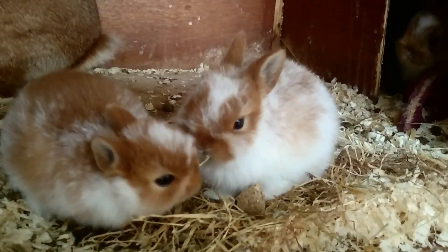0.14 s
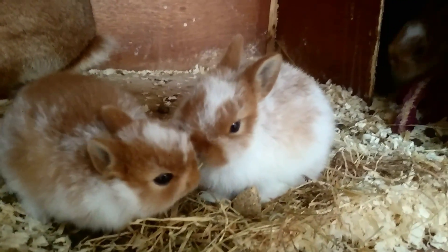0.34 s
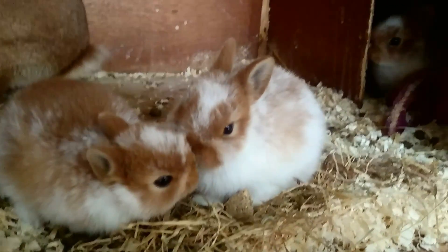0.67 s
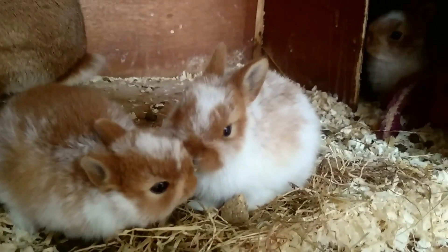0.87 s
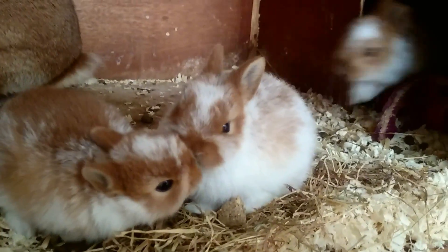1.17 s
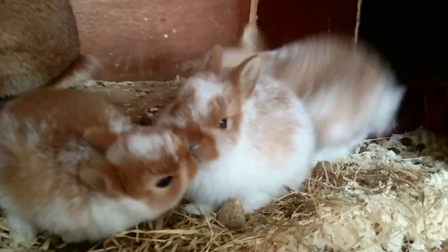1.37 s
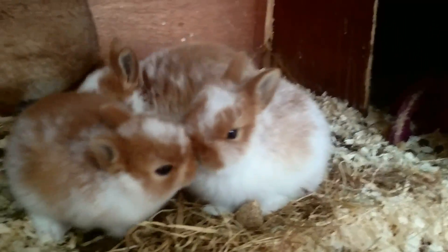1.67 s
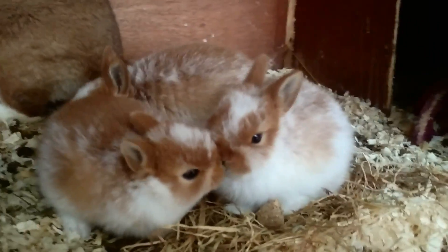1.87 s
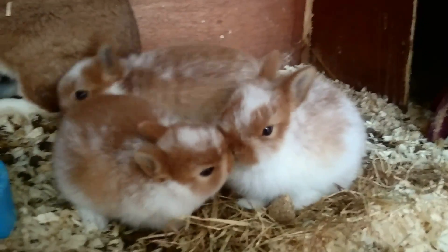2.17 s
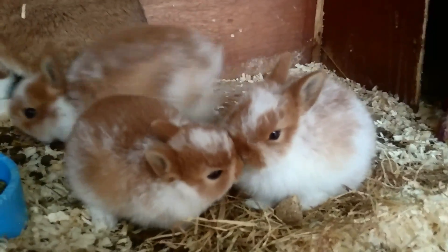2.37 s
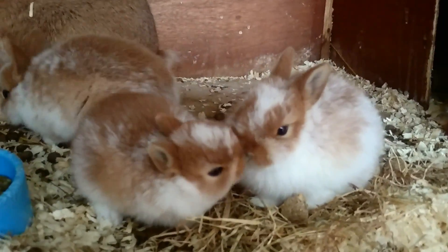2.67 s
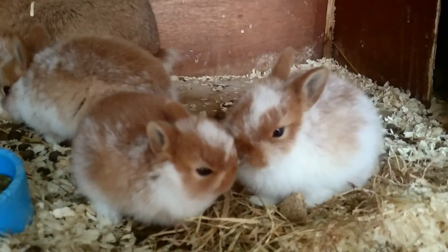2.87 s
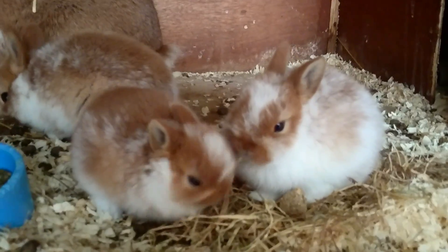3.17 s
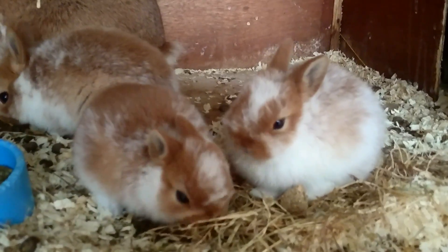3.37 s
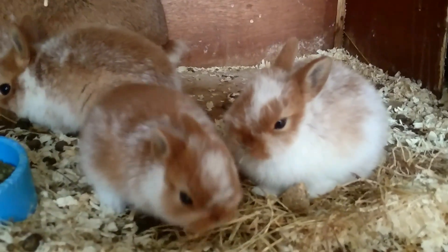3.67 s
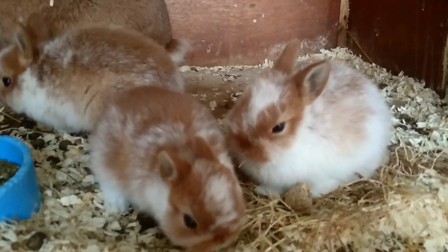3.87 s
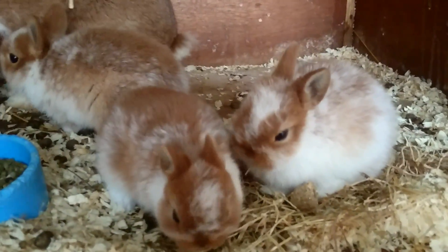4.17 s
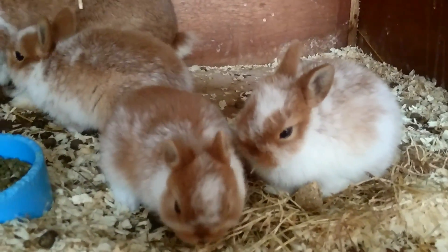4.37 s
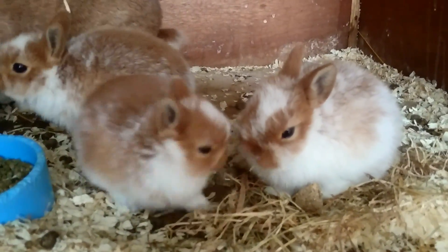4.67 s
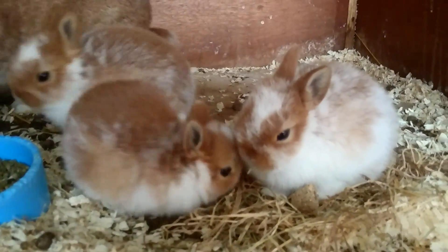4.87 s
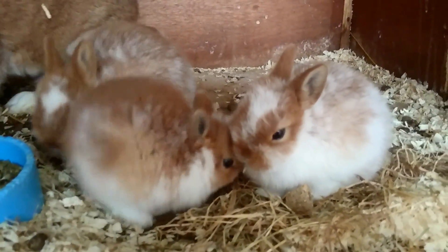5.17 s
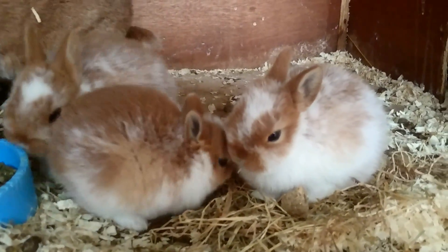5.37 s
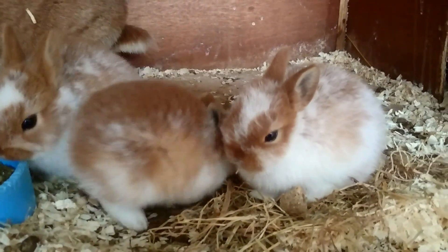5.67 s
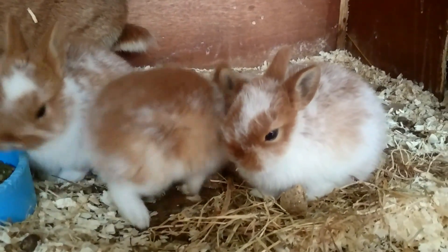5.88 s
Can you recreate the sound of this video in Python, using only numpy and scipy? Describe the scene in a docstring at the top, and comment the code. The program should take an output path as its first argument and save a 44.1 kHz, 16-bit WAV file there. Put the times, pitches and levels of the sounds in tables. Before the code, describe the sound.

A close, dry stereo sound inside a small wooden hutch, over soft steady hiss and a very faint low hum. From 0 s, rabbits shuffle in shavings and hay: fine, mid-high crackling in short uneven bursts, with grainier crunch and airy hay rustle. Crisp snaps cluster at 0.9-1.5 s, the brightest near 1.2 s, while soft paw thumps fall mostly between 0.05 and 1.6 s and fur brushes faintly on wood. Lighter rustling continues through 2-3.8 s, with a slight lull near 2.5 s, a crumbling crunch at 3.2 s and thin stalk squeaks around 3.6 s. At 3.95 s a paw thuds and a hard bit clacks in quick contacts. Then it is sparse: a small squeak at 4.6 s, four short low thrums with faint rising buzz from 5.0 to 5.3 s, quiet rubbing, and small snaps at 5.6-5.8 s, leaning right, before a last light rustle.

```python
"""Young rabbits shuffle and hop on dry wood shavings and hay: random clicks, coloured as flake, litter and hay.
Flakes crack, stalks scrape or squeak, a hard piece clacks and fur rubs the wood, from noise and damped rings.
The place is a small wooden hutch with short echoes; paws land on its floor board.
Behind are a soft hiss, a wavering low hum and a thrum that swells briefly four times with a rising buzz.
A two-port microphone hears it, with a different colour on each side and the extreme top cut."""
import sys
import numpy as np
from scipy import signal
from scipy.fft import rfft, irfft, next_fast_len
from scipy.io import wavfile
from scipy.ndimage import uniform_filter1d

SR = 44100
rng = np.random.default_rng(int(sys.argv[2]) if len(sys.argv) > 2 else 0)


def wav_out(sig):
    """Save sig, one row per channel (or a flat mono array), as 16-bit PCM at SR to the path in sys.argv[1]."""
    wavfile.write(sys.argv[1], SR, np.round(np.clip(np.atleast_2d(sig).T, -1, 1) * 32767).astype(np.int16))


N = 266364
TIME = np.arange(N) / SR

# Levels are settings ahead of each source's own trims, the panning and the microphone.
# rabbits shifting their feet or pushing through the litter:
# start_s, length_s, crackle_db, crunch_db (re crackle), hay_db (re crackle)
SHUFFLES = [(0, .11, -53, -9.5, -9.5), (0.213, 0.047, -46, -7.5, -11.5), (0.3, 0.015, -36.5, -16, -14),
            (0.334, 0.075, -42, -10, -13), (0.431, 0.2077, -51.5, -12, -10), (0.629, 0.06, -44, -13, -12),
            (0.729, .11, -46.5, -12, -12.5), (0.86, 0.0482, -43.5, -15.5, -10.5),
            (1, 0.03043, -40, -14.5, -14.5), (1.11, 0.075, -42, -18, -10),
            (1.235, 0.056, -45.5, -19.5, -15.5), (1.34, 0.022, -40, -17, -12.5),
            (1.405, 0.086, -41.5, -9.5, -10), (1.519, 0.074, -52, -10, -6), (1.694, 0.096, -47.5, -15, -14),
            (1.836, 0.0566, -47.5, -19, -14.5), (1.923, 0.094, -45.5, -19.5, -15.5),
            (2.15, 0.085, -40.5, -19.5, -13), (2.261, 0.089, -41, -15.5, -10.5),
            (2.574, 0.0132, -50, -12.5, -12), (2.678, 0.016, -54, -9, -16.5),
            (2.769, 0.049, -42.5, -13.5, -16), (2.831, 0.082, -45.5, -13, -10.5),
            (2.932, 0.077, -51, -6, -7.5), (3.053, 0.025, -46, -9.5, -5), (3.114, 0.058, -51, -8.5, -8),
            (3.195, 0.096, -45.5, -12, -7.5), (3.311, 0.081, -56, -10.5, -7.5), (3.463, .03, -47, -5.5, -9),
            (3.498, 0.02546, -37.5, -19.5, -11.5), (3.57, 0.07, -48, -12, -16),
            (3.669, 0.034, -42.5, -18, -16), (3.725, 0.047, -40.5, -17, -15),
            (3.799, 0.017, -41, -22, -13.5), (3.85, 0.14, -47, -12, -11), (4.017, 0.0384, -60, -7, -4),
            (4.147, 0.12, -58.5, -17.5, -9.5), (4.37, 0.037, -52.5, -8, -12.5),
            (4.453, 0.033, -57.5, -9, -26), (4.554, .025, -51.5, -15, -26), (4.656, 0.085, -55, -19, -35.5),
            (5.257, 0.13, -56.5, -7, -12.5), (5.413, 0.055, -52, -6, -10.5), (5.589, 0.1, -55.5, -7, -17),
            (5.772, 0.18, -55, -10.5, -11), (5.96, 0.048, -46, -9.5, -12.5)]
# pitch of the flakes underfoot, higher where they are smaller: time_s, pitch_hz
FLAKE_PITCH = [(0, 5430), (0.9, 4150), (1.16, 5403), (2.2, 4170), (3.05, 4462), (3.25, 5404), (4.1, 5085),
               (4.6, 4286)]
# flakes and stalks that give way:
# start_s, level_db (over 10 ms), crunch_db (re crackle), hay_db (re crackle), crumble_s, pitch_hz
SNAPS = [(0.221, -43.5, -10.5, -10, 0.0022, 4570), (0.4356, -38, -13.5, -12.5, 0.002, 5200),
         (0.552, -41.5, -18.5, -31, 0.0021, 4906), (0.9115, -40, -19, -27, 0.0012, 4178),
         (0.9324, -34.5, -12.5, -22.5, .0022, 4190), (0.9457, -40.5, -12, -18, 0.002, 4180),
         (0.9808, -47, -16.5, -22, 0.00045, 3970), (1.003, -33.5, -16, -24.5, 0.0021, 4260),
         (1.014, -31.5, -19.5, -34, 0.00086, 4500), (1.092, -43.5, -21, -18, 0.004, 4380),
         (1.1223, -39, -13.5, -27, 0.0031, 4500), (1.2155, -30.3, -23.5, -20, 0.0011, 5170),
         (1.2905, -47, -19, -23, 0.00028, 4234), (1.445, -34, -7.5, -16.5, .009, 5490),
         (1.467, -42.5, -9, -15, .0035, 4460), (1.494, -43.5, -28, -25, 0.0006, 4750),
         (1.587, -51, -25, -15, 0.0036, 4494), (1.6394, -50, -17.5, -15, 0.0029, 4947),
         (1.9025, -40, -23, -24, 0.00079, 4590), (2.115, -47, -17, -27.5, 0.0155, 4442),
         (2.176, -42.5, -23, -21, 0.00205, 4971), (2.2852, -36.5, -15, -18, 0.001106, 4049),
         (2.3238, -39.5, -12, -22, 0.0029, 4355), (2.7274, -48.5, -21, -21, 0.0046, 4910),
         (3.072, -46, -11, -12.5, 0.00058, 4649), (3.084, -49.5, -22, -24, 0.00178, 4510),
         (3.183, -36.5, -25, -14.5, 0.012, 4874), (3.211, -39, -29, -17, 0.00071, 4950),
         (3.245, -44.5, -2.5, -15, 0.025, 4510), (4.558, -50, -17.5, -18.5, 0.0056, 4620),
         (4.912, -49, -16.5, -43, 0.00259, 3997), (5.565, -47, -1, -28.5, 0.012, 4090),
         (5.7631, -44, -6.5, -17, 0.00626, 5080), (5.7699, -39.5, -17, -20.5, 0.001006, 4320)]
# colours of flakes, deep litter and hay: frequency_hz, density_db (relative, per Hz)
CRACKLE_COLOUR = [(1800, -64), (2900, -13), (3900, -4.5), (4400, 0.5), (4850, 1), (5350, -2.5), (5900, -2),
                  (6500, -10.5), (7400, -23), (10000, -63)]
CRUNCH_COLOUR = [(120, -51), (350, -10.5), (800, -16), (1700, -6.5), (2200, 0), (2650, 0.5), (3200, -8),
                 (4200, -21.5)]
HAY_COLOUR = [(4500, -24), (7000, 5), (9500, 1), (11200, 2.5), (13300, -6), (15300, -3.5), (17000, 1)]
# single stalks dragged over the wood:
# start_s, length_s, level_db (rms at mid-scrape), pitch_hz (at start), glide_octaves, width_hz
SCRAPES = [(1.148, 0.073, -57, 2367, -0.035, 128), (2.86, 0.09, -61, 14190, 0, 3002),
           (3.015, 0.2, -59, 14800, 0, 3396), (3.578, 0.033, -46, 4530, -0.043, 50),
           (3.76, 0.19, -55.5, 2650, -0.3, 380.1), (4.621, 0.054, -50.5, 4525, -0.05, 200),
           (4.639, 0.01373, -47, 4427, -0.0097, 59.86), (5.76, 0.011, -50, 14300, 0.064, 2995)]
# contacts of one hard piece of litter, nudged as a paw lands: start_s, level_db
CLACKS = [(3.9398, -41), (3.9547, -30), (3.9558, -39.5), (3.9592, -40.5)]
# ringing modes of that hard piece: pitch_hz, level_db, t60_s
CHIP_MODES = [(1346, -14.5, 0.024), (2030, 3, 0.013), (2257, 3.5, 0.0233), (2555, -7, 0.026),
              (3934, 4, 0.0053)]
# fur rubbing along the wood: start_s, length_s, level_db
RUBS = [(0, 1.48, -72.5), (2.71, 0.43, -74), (3.273, 0.198, -63.5), (5.245, 0.34, -68.5)]
# resonances of the rubbed wall: pitch_hz, width_hz, level_db
WALL_RESONANCES = [(556, 310, 1), (838, 110, 2.5)]
# where the moving rabbit is: time_s, left_right_db
PLACE = [(4.7, 0), (5.75, -4.5), (6.04, 0)]
# paws landing on the floor board: start_s, level_db, knock_db (added to the upper modes)
PAWS = [(0.055, -54, -4), (0.216, -60, 8.5), (0.321, -51.5, -4), (0.389, -66, 25), (0.576, -49.5, -10.5),
        (1.086, -61, 0), (1.173, -50.5, -15), (1.373, -55.5, -7), (1.47, -47.5, 1), (1.522, -50.5, -19),
        (1.575, -52, -21), (3.252, -57.5, 9), (3.935, -48.5, -4.5), (5.565, -64, 8), (5.762, -61.5, 9)]
# modes of the floor board: pitch_hz, level_db, t60_s
BOARD_MODES = [(76, -7.5, 0.205), (128, -1, 0.064), (161, -5, 0.03), (418, -5.5, 0.092), (570, 2, 0.018),
               (877, -2, 0.029)]
# swells of the low thrum: start_s, length_s, level_db, buzz_db (re thrum), buzz_hz (at start)
THRUMS = [(4.974, 0.068, -48, -14, 222), (5.077, 0.05, -57.5, -18, 220), (5.183, 0.035, -60, -14.5, 250),
          (5.306, 0.024, -52.5, -9.5, 252)]
# colour of the background hiss: frequency_hz, density_db (relative, per Hz)
HISS_COLOUR = [(26, -25), (43, 21.5), (62, 12), (130, 5.5), (300, 2), (550, -2.5), (1000, 0.5), (3200, 2),
               (4700, 7), (7500, -7), (13500, -9), (15400, -6)]
# difference between the two microphone ports: frequency_hz, left_right_db
PORTS = [(60, -7.5), (300, -4), (700, -2.5), (1500, -5.5), (2250, -9.5), (3300, -3.5), (4500, -4),
         (5900, -7.5), (7200, 0.5), (9000, -1.5), (10800, 4), (13500, -5), (15500, 2)]

SHUFFLE_ATTACK_S, SHUFFLE_RELEASE_S = 0.035, 0.022
ATTACK_SHARE = 0.22  # a longer push builds longer: extra attack as a share of its length
# the litter never quite rests under the sitting rabbits
IDLE_CRACKLE_DB, IDLE_CRUNCH_DB, IDLE_HAY_DB = -68, -72.5, -98
CRACK_SWELL_S = 0.00034  # a crack's rise time
CLEAN_BREAK_S = 0.00196  # crumbling time at which the crack's energy share is one half
RUB_ATTACK_S, RUB_RELEASE_S = 0.0254, 0.24
THRUM_HZ, BUZZ_RISE_HZ_PER_S = 67, 748
THRUM_ATTACK_S, THRUM_RELEASE_S = 0.034, 0.0237
HISS_DB, HUM_DB = -59.5, -72.5
RIGHT_LAG_S = 0.00031  # the direct sound reaches the right side later
CUTOFF_HZ = 15850


def litter(wander_hz=350, slips_per_s=2100, rate_rise=0.4, clump_db=1.11):
    """Flakes slip in clumps, more often when stirred harder; each slip sounds in flake, deep litter and hay."""
    _, _, _, crunch_db, hay_db = np.transpose(SHUFFLES)
    _, _, snap_crunch_db, snap_hay_db, _, _ = np.transpose(SNAPS)
    stir = stirring(0, IDLE_CRACKLE_DB)
    # slips_per_s holds where the stir is -45 dB
    born = rng.random(N) < slips_per_s * (stir / from_db(-45)) ** rate_rise / SR
    clumps = from_db(clump_db * drift(54))

    crackle = clumps * stir * slips(born, spread_db=4.0)
    crunch = from_db(5.0) * clumps * stirring(crunch_db, IDLE_CRUNCH_DB) * slips(born, spread_db=3.0)
    hay = clumps * stirring(hay_db, IDLE_HAY_DB) * slips(born, spread_db=3.5)

    # the crackle of a snap gets the energy that its first crack leaves over
    crumbling_db = 10 * np.log10(1 - crack_share())
    crackle += from_db(2.5) * snaps(crumbling_db, crumbs_per_s=2700, crumb_db=-7.5)
    crunch += from_db(9.5) * snaps(snap_crunch_db, crumbs_per_s=2000, crumb_db=4.5)
    hay += from_db(5.0) * snaps(snap_hay_db, crumbs_per_s=2500, crumb_db=-4)

    flake_hz = in_time(FLAKE_PITCH)[0] + wander_hz * drift(8.1)
    crackle = flakes(crackle, flake_hz, 2490, 8270, reach_hz=1038, cycles=22,
                     ring_db=-1.0, patchy_db=6.5, count=19)
    crunch = flakes(crunch, np.full(N, 2200), 836, 2990, reach_hz=1810, cycles=7.5,
                    ring_db=5.5, patchy_db=5.0, count=10)
    return scatter(crackle, CRACKLE_COLOUR) + scatter(crunch, CRUNCH_COLOUR) + scatter(hay, HAY_COLOUR)


def stirring(material_db, idle_db):
    """How strongly the shuffles stir one material of the litter, as a gain."""
    s, length_s, db, _, _ = np.transpose(SHUFFLES)
    attack_s = SHUFFLE_ATTACK_S + ATTACK_SHARE * length_s
    moving = swells(s, length_s, db + material_db, attack_s, SHUFFLE_RELEASE_S)
    return np.hypot(moving, from_db(idle_db))


def slips(born, spread_db):
    """Clicks of uneven size and random sign at the given instants, evened to a slow rms near 1."""
    unevenness = np.minimum(rng.exponential(1, N), 4.5)
    sizes = born * from_db(spread_db * unevenness) * rng.choice([-1, 1], N)
    slow_power = np.maximum(uniform_filter1d(sizes ** 2, size=1400), 0)
    return sizes / np.sqrt(slow_power + 0.0005)


def snaps(extra_db, crumbs_per_s, crumb_db, build_share=0.26):
    """Each snap is one fracture and a dying run of smaller ones; a long crumbling takes a moment to build."""
    out, t = np.zeros(N), TIME[:SR // 15]
    for (s, db, _, _, crumble_s, _), more_db in zip(SNAPS, extra_db):
        age = t / max(crumble_s, 1e-4)
        crumbs = (rng.random(len(t)) < crumbs_per_s / SR) * rng.standard_normal(len(t))
        burst = from_db(crumb_db) * crumbs * np.exp(-age) * np.minimum(age / build_share, 1)
        burst[0] = np.exp(-crumble_s / (2 * CLEAN_BREAK_S))
        # level as an rms over 10 ms
        burst *= from_db(db + more_db) * np.sqrt(SR / 100) / np.linalg.norm(burst)
        at = int(s * SR)
        out[at:at + len(t)] += burst[:N - at]
    return out


def flakes(clicks, centre_hz, low_hz, high_hz, reach_hz, cycles, ring_db, patchy_db, count):
    """Each click also rings a few flakes near a centre pitch; which ones speak most keeps changing."""
    at, rings = np.flatnonzero(clicks), 0
    pitches = np.linspace(low_hz, high_hz, count)
    favour = []
    for hz in pitches:
        nearness = 1 / (1 + ((hz - centre_hz[at]) / reach_hz) ** 2)
        favour.append(from_db(patchy_db * drift(25)[at]) * nearness)
    favour = np.array(favour)
    favour /= np.linalg.norm(favour, axis=0)
    for hz, share in zip(pitches, favour):
        t60 = cycles / hz
        struck = np.zeros(N)
        struck[at] = clicks[at] * share * rng.choice([-1, 1], len(at))
        # scaled so that the rings are as strong per Hz as the bare click
        even = np.sqrt(8 * np.log(1000) * (high_hz - low_hz) / t60) / SR
        rings = rings + even * ring(struck, hz, t60)
    return (clicks + from_db(ring_db) * rings) / np.sqrt(1 + from_db(2 * ring_db))


def scatter(clicks, spectrum, moves_per_s=60, count=8):
    """Clicks take their material's colour; each short run of them comes from one spot with its own echoes."""
    spot = np.cumsum(rng.random(N) < moves_per_s / SR) % count
    tone = colour(spectrum, size=1024)
    out = 0
    for k in range(count):
        echoes = hutch(scatter_db=4.5, scatter_t60=0.047, tail_db=-1.0, tail_t60=0.13, size=6000)
        out = out + through(clicks * (spot == k), through(tone, echoes))
    return out


def crack_share():
    """The share of each snap's energy that goes into its first crack; the rest crumbles."""
    crumble_s = np.maximum(np.array(SNAPS)[:, 4], 1e-4)
    return 1 / (1 + (crumble_s / CLEAN_BREAK_S) ** 2)


def cracks(level_db=1.5):
    """Each breaking flake rings for a few cycles at its own pitch, on top of the litter and so nearly dry."""
    out, t = np.zeros(N), TIME[:SR // 100]
    for (s, db, _, _, _, hz), share in zip(SNAPS, crack_share()):
        tone = t * np.exp(-t / CRACK_SWELL_S) * np.sin(2 * np.pi * hz * t)
        at = int(s * SR)
        out[at:at + len(t)] += from_db(db + level_db) * np.sqrt(share) * rms_one(tone)
    return through(out, near_walls())


def scrapes(own_share=0.47):
    """Stick and slip keeps a narrow resonance of the stalk going; its pitch glides a little."""
    out = np.zeros((2, N))
    for s, length, db, hz, glide, width in SCRAPES:
        u = np.linspace(0, 1, int(length * SR))
        noise = rng.standard_normal((3, SR)) + 1j * rng.standard_normal((3, SR))
        both_sides = noise[0] + own_share * noise[1:]
        lowpass = signal.butter(2, width / 2, fs=SR, output="sos")
        grip = signal.sosfilt(lowpass, both_sides)[:, -len(u):]  # the settled end
        phase = 2 * np.pi * np.cumsum(hz * 2 ** (glide * u)) / SR
        tone = np.real(grip * np.exp(1j * phase))
        at = int(s * SR)
        out[:, at:at + len(u)] += (from_db(db) * np.sin(np.pi * u) * rms_one(tone))[:, :N - at]
    return out


def clack(echo_db=-9):
    """A few quick contacts ring the hard piece, each mode with a strength of its own."""
    s, contact_db = np.transpose(CLACKS)
    out = np.zeros(N)
    for k, (hz, db, t60) in enumerate(CHIP_MODES):
        hits = np.zeros(N)
        hits[(s * SR).astype(int)] = from_db(contact_db + db + rng.normal(0, 1, len(s)))
        out += (-1) ** k * ring(hits, hz, t60)
    return out + from_db(echo_db) * through(out, near_walls())


def fur(uneven_db=2.0):
    """Friction noise of uneven pressure sounds in the resonances of the wall."""
    pressure = swells(*np.transpose(RUBS), RUB_ATTACK_S, RUB_RELEASE_S) * from_db(uneven_db * drift(7.8))
    friction = rng.standard_normal(N) + 0.66 * rng.standard_normal((2, N))
    wall = 0
    for hz, width, db in WALL_RESONANCES:
        t60 = np.log(1000) / (np.pi * width)
        wall = wall + from_db(db) * rms_one(ring(friction, hz, t60))
    highpass = signal.butter(4, 470, "high", fs=SR, output="sos")
    return pressure * rms_one(signal.sosfilt(highpass, wall))


def paws(knock_above_hz=200, settle_s=0.054, settle_db=-5):
    """A padded foot thumps on the board and settles; a firm one also wakes the upper modes."""
    out, t = np.zeros(N), TIME[:SR // 10]
    s, db, knock_db = np.transpose(PAWS)
    for k, (hz, mode_db, t60) in enumerate(BOARD_MODES):
        upper = hz > knock_above_hz
        pushes = np.zeros(N)
        for at, gain in zip((s * SR).astype(int), from_db(db + mode_db + knock_db * upper)):
            settling = rng.standard_normal(len(t)) * np.exp(-t / settle_s)
            pushes[at:at + len(t)] += gain * from_db(settle_db) * settling / np.linalg.norm(settling)
            pushes[at] += gain
        out += (-1) ** (k * upper) * ring(pushes, hz, t60)
    return signal.sosfilt(signal.butter(2, 55, "high", fs=SR, output="sos"), out)


def thrum(waver=0.033, second_db=-19):
    """A wavering low tone swells; each swell wakes a buzz that bends upward and throbs with the tone."""
    phase = 2 * np.pi * np.cumsum(THRUM_HZ * (1 + waver * drift(11.2))) / SR
    tone = np.sin(phase) + from_db(second_db) * np.sin(2 * phase)
    s, length_s, db, _, _ = np.transpose(THRUMS)
    out = swells(s, length_s, db, THRUM_ATTACK_S, THRUM_RELEASE_S) * tone
    for s, length_s, db, buzz_db, first_hz in THRUMS:
        hz = first_hz + BUZZ_RISE_HZ_PER_S * np.clip(TIME - s, 0, length_s)
        buzz = np.sin(2 * np.pi * np.cumsum(hz) / SR) * (1 + np.sin(phase) / 2)
        out += swells(s, length_s, db + buzz_db, THRUM_ATTACK_S, THRUM_RELEASE_S) * buzz
    return np.sqrt(2) * out


def background(shared_below_hz=900):
    """Steady coloured hiss, more alike on both sides in the bass, and a hum of narrow, wavering noise."""
    b, a = signal.butter(1, shared_below_hz, "high", fs=SR)
    mid, side = rng.standard_normal((2, N))
    side = 0.6 * side + 0.43 * signal.lfilter(b, a, side)
    hiss = rms_one(through(mid + side * [[1], [-1]], colour(HISS_COLOUR)))
    hum = rms_one(ring(np.diff(rng.standard_normal(N + 1)), 62.3, 0.098))
    return from_db(HISS_DB) * hiss * from_db([[0.7], [-0.7]]) + from_db(HUM_DB) * hum


def hutch(scatter_db, scatter_t60, tail_db, tail_t60, size):
    """Direct sound, a quick scatter off the close walls and a tail; unit energy per side."""
    t = TIME[:size]
    response = np.zeros((2, size))
    response[0, 0] = response[1, int(abs(RIGHT_LAG_S) * SR)] = 1
    for db, t60 in ((scatter_db, scatter_t60), (tail_db, tail_t60)):
        echoes = rng.standard_normal((2, size)) * from_db(-60 * t / t60) * np.minimum(t / 0.00081, 1)
        response += from_db(db) * echoes / np.linalg.norm(echoes, axis=1, keepdims=True)
    return response / np.linalg.norm(response, axis=1, keepdims=True)


def near_walls():
    """The lighter echoes around a sound made on top of the litter."""
    return hutch(scatter_db=0.0, scatter_t60=0.0524, tail_db=-10.5, tail_t60=0.21, size=6000)


def swells(s, length_s, db, attack_s, release_s, size=40):
    """Gain of a run of movements: each rises around its start, holds for its length and dies away."""
    t = TIME[::size, None] - s
    rise = np.clip(0.5 + t / attack_s, 0, 1)
    shapes = rise * np.exp(-np.maximum(t - length_s, 0) / release_s)
    return np.interp(TIME, TIME[::size], np.linalg.norm(shapes * from_db(db), axis=1))


def ring(x, hz, t60):
    """A damped resonance: a unit click sets a sine of height 1 ringing."""
    r, w = from_db(-60 / (t60 * SR)), 2 * np.pi * hz / SR
    return signal.lfilter([0, np.sin(w)], [1, -2 * r * np.cos(w), r * r], x + 1e-18)


def colour(points, size=8192):
    """Causal (minimum-phase) impulse response of a spectrum, with unit energy."""
    hz, db = np.transpose(points)
    grid = np.maximum(np.fft.rfftfreq(size, 1 / SR), 1)
    cepstrum = irfft(np.log(from_db(np.interp(np.log(grid), np.log(hz), db))))
    # fold the later half onto the earlier one
    cepstrum[1:size // 2] *= 2
    cepstrum[size // 2 + 1:] = 0
    response = irfft(np.exp(rfft(cepstrum)))
    return response / np.linalg.norm(response)


def through(x, response):
    """Sound through one impulse response per channel."""
    return signal.oaconvolve(np.atleast_2d(x), np.atleast_2d(response), axes=1)[:, :N]


def drift(rate, size=40):
    """Slow chance with a spread of 1: noise smoothed by two equal poles at rate (Hz), in short steps."""
    r = np.exp(-2 * np.pi * size * rate / SR)
    slow = signal.lfilter([1], [1, -2 * r, r * r], rng.standard_normal(2 * N // size))
    return np.repeat(rms_one(slow[-(N // size + 1):]), size)[:N]


def in_time(rows):
    """Each column of a curve, at every sample."""
    s, *columns = np.transpose(rows)
    return [np.interp(TIME, s, c) for c in columns]


def from_db(db):
    """Decibels to gain."""
    return 10 ** (np.asarray(db) / 20)


def rms_one(x):
    """Scaled to an rms of 1."""
    return x / np.sqrt(np.mean(x ** 2) + 1e-20)


def split_sides(left_right_db):
    """Left and right gains for a level difference, with their mean power kept at 1."""
    sides = from_db(np.array([left_right_db, -left_right_db]) / 2)
    return sides / np.sqrt(np.mean(sides ** 2, axis=0))


def scene():
    """The rabbits' litter and fur sounds placed left to right, over paws, thrum and background."""
    sides = split_sides(in_time(PLACE)[0])
    rabbits = litter() + cracks() + scrapes() + clack() + fur()
    return sides * rabbits + paws() + thrum() + background()


def record(dry):
    """Each microphone port colours its side; the top is cut."""
    hz, db = np.transpose(PORTS)
    size = next_fast_len(N + SR // 10)
    grid = np.maximum(np.fft.rfftfreq(size, 1 / SR), 1)
    gains = split_sides(np.interp(np.log(grid), np.log(hz), db))
    heard = irfft(rfft(dry, size) * gains, size)[:, :N]
    return signal.sosfilt(signal.ellip(10, 0.2, 70, CUTOFF_HZ, fs=SR, output="sos"), heard)


dry = scene()
out = record(dry)
wav_out(out)
```